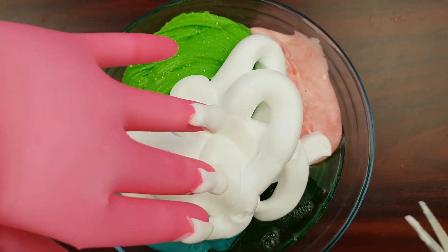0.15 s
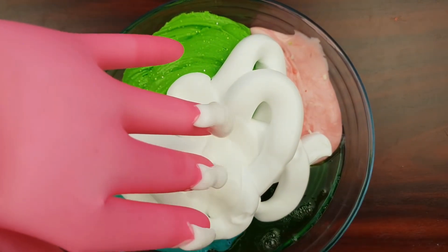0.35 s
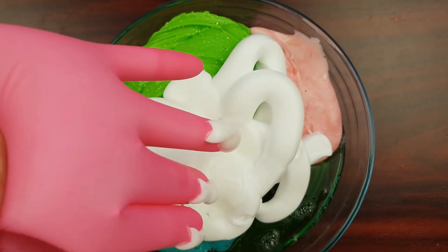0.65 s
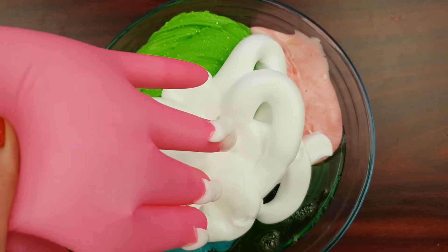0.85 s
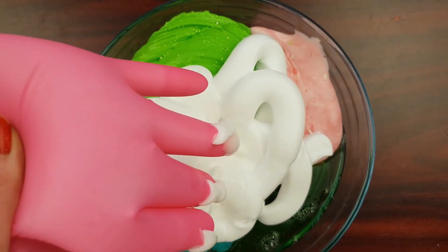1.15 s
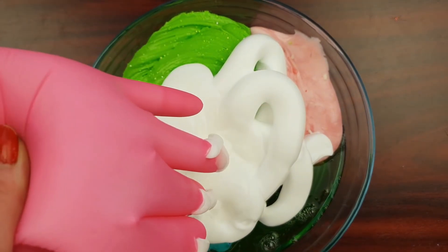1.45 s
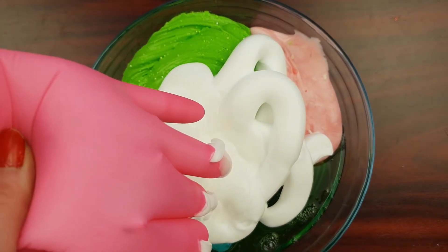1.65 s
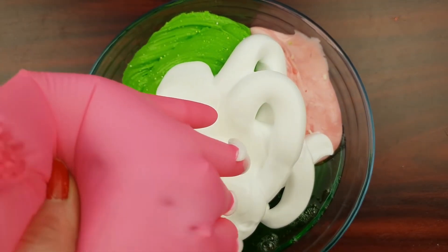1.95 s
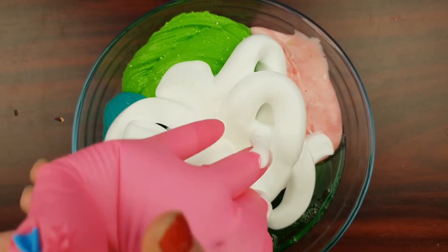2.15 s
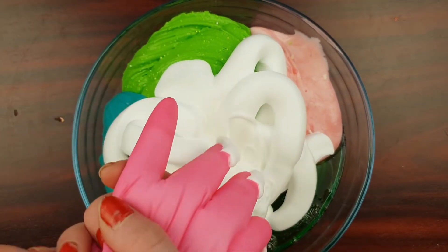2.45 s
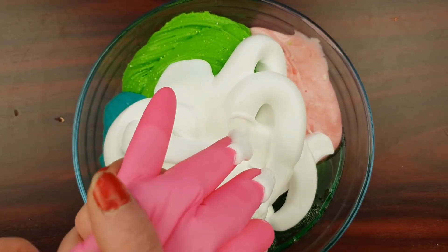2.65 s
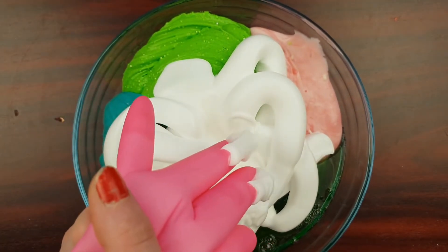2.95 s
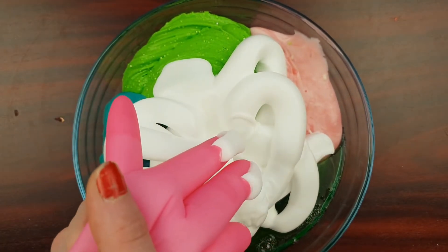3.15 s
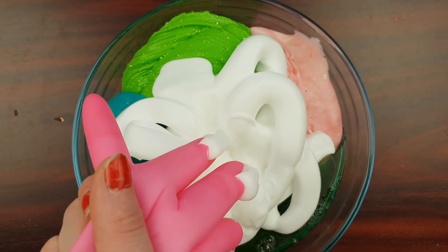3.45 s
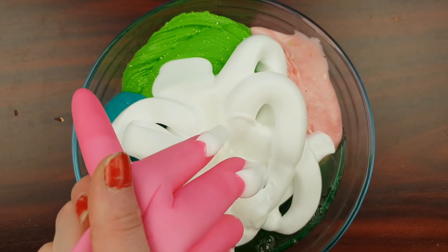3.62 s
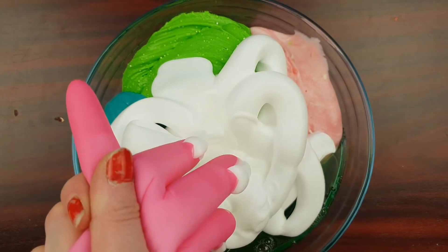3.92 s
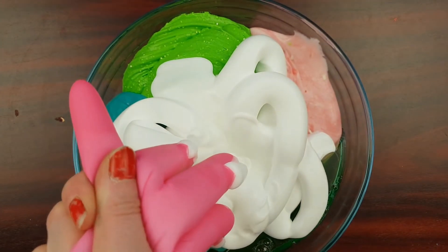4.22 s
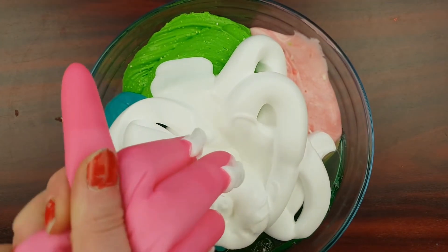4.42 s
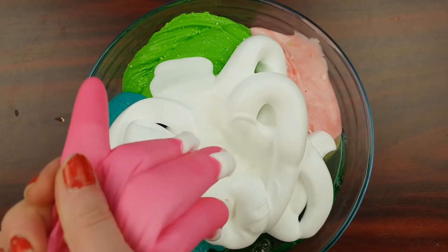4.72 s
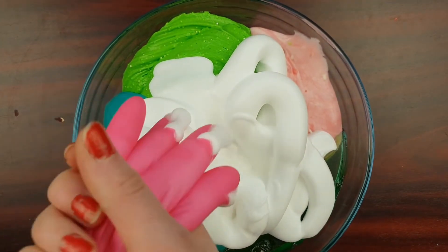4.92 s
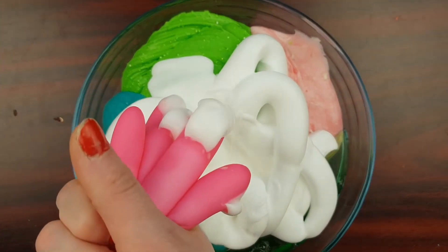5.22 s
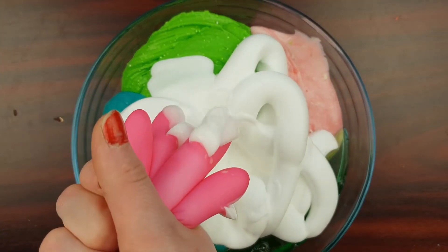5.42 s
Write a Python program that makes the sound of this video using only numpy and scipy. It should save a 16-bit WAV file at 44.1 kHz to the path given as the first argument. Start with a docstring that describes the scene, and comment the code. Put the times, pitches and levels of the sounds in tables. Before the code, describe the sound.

Close microphone, mostly left of centre, small room with low rumble. Foam sputters and fizzes from rubber fingertips, bubbles snap, and two openings gurgle upwards before breaking into puffs. Crumpled rubber rubs softly, then trapped air spits and blasts out with a hollow ring. A hissing squeal and quick squeaks follow; after quiet rubbing, bright pops and a small squelch end it.

```python
"""A rubber glove full of foam and air is squeezed over a glass bowl, close by in a small room.
Over low room rumble and a deep throb, the cut fingertips sputter with shaped noise grains and bubbles pop
as gliding sines with noise cracks. Two fingertips gurgle upwards as rough harmonics, rubber rubs as dense
grains, a wet opening spits, and trapped air bursts out as ragged noise that sets the hollow ringing.
Then openings squeal like wet reeds with hissing jets, among more rubs and pops, and one last squelch."""
import sys
import numpy as np
from scipy import signal
from scipy.fft import rfft, irfft
from scipy.io import wavfile
from scipy.ndimage import uniform_filter1d

SR = 44100
rng = np.random.default_rng(int(sys.argv[2]) if len(sys.argv) > 2 else 0)


def put_to_file(sound):
    """Save the sound as 16-bit audio at rate SR, in the file named by the first command-line argument."""
    columns = np.atleast_2d(sound).T  # one column per channel
    safe = np.clip(columns, -1, 1)
    whole_steps = np.round(safe * 32767)
    wavfile.write(sys.argv[1], SR, whole_steps.astype(np.int16))


N = 246078
T = np.arange(N) / SR  # time [s]


def undb(db):
    """Decibels to gain."""
    return 10 ** (np.asarray(db) / 20)


def unit(x):
    """Scale to rms 1."""
    return x / np.sqrt(np.mean(x ** 2) + 1e-20)


def follow(table):
    """The samples that a curve table covers, and its columns at those samples."""
    s, *columns = np.transpose(table)
    at = np.flatnonzero((T >= s.min()) & (T <= s.max()))
    return at, [np.interp(T[at], s, c) for c in columns]


def around(s, size):
    """The samples around a moment, and their times from it."""
    steps = np.arange(size) - size // 2
    return int(s * SR) + steps, steps / SR


def lay(at, x):
    """Put a short sound at its samples on a silent track."""
    return np.bincount(at, x, N)[:N]


def stroke(t, rise_s, hold_s, fall_s, sag_db_per_s=0):
    """Level in dB of one push: 0 at t = 0, sagging while held; rise and fall each span 30 dB."""
    outside = np.maximum(-t, 0) / rise_s + np.maximum(t - hold_s, 0) / fall_s
    return -30 * outside - sag_db_per_s * np.clip(t, 0, hold_s)


def ease(x, first, last):
    """Smooth step from one value to another, halfway at x = 0."""
    return first + (last - first) * (1 + np.tanh(x / 2)) / 2


def colour(x, points, size=4096):
    """Causal minimum-phase filter through (Hz, dB) points; the result has rms 1."""
    hz, db = np.transpose(points)
    f = np.log(np.maximum(np.arange(size // 2 + 1), .5) * SR / size)
    # beyond the outermost points the response falls away steeply
    outside = np.maximum(np.log(hz[0]) - f, 0) + np.maximum(f - np.log(hz[-1]), 0)
    log_gain = np.log(undb(np.interp(f, np.log(hz), db))) - 2 * outside
    # folding the cepstrum forward in time makes the filter causal
    cepstrum = irfft(log_gain)
    cepstrum[1:size // 2] *= 2
    cepstrum[size // 2 + 1:] = 0
    response = irfft(np.exp(rfft(cepstrum)))
    return unit(signal.oaconvolve(x, response)[:len(x)])


def band(x, low_hz, high_hz):
    """Band-pass: takes away the bass below and the treble above."""
    sos = signal.butter(3, [low_hz, high_hz], "band", fs=SR, output="sos")
    return signal.sosfilt(sos, x)


def wander(count, hz):
    """Smooth random motion up to a given rate, rms 1."""
    return unit(signal.sosfilt(signal.butter(2, hz, fs=SR, output="sos"), rng.standard_normal(count)))


def whistle(hz, width_hz):
    """Noise in one resonance whose centre may slide; rms 1."""
    n = len(hz)
    slow_noise = wander(n, width_hz) + 1j * wander(n, width_hz)
    carrier = np.exp(2j * np.pi * np.cumsum(hz) / SR)
    return unit((slow_noise * carrier).real)


def grains(count, rate, spread_db, hiss):
    """Tiny films tearing at random moments (rate per second), uneven in size, over a smooth rush of air."""
    clicks = (rng.random(count) < rate / SR) * rng.choice([-1, 1], count)
    sizes = undb(spread_db * np.minimum(rng.exponential(size=count), np.pi))
    return unit(unit(clicks * sizes) + hiss * rng.standard_normal(count))


def room_tone(level_db=-62, shared_db=-2, own_db=-2):
    """Low room rumble and faint hiss: filtered noise, partly shared by the two channels."""
    # spectrum: (frequency [Hz], level [dB])
    tone_colour = [(15, -39), (25, -8), (117, -7), (301, -22), (714, -29), (796, -27.5), (1230, -28.5),
                   (1840, -30.5), (16000, -34.5)]
    shared, *own = (colour(rng.standard_normal(N), tone_colour) for _ in range(3))
    return undb(level_db) * (undb(shared_db) * shared + undb(own_db) * np.array(own))


def throb(hz=36.9, level_db=-50.5, full_s=.8):
    """A deep throb while the glove is taut: one sine that swells, sags and drops away."""
    db = level_db + stroke(T - full_s, rise_s=1.24, hold_s=1.36, fall_s=.2, sag_db_per_s=6)
    return unit(np.sin(2 * np.pi * hz * T)) * undb(db)


def sputter(sag_db_per_s=17):
    """Foam breaks up at the fingertips in overlapping spurts: low crackles and a fine spray."""
    # spurts of foam: (time [s], crackle level [dB], spray level [dB], rise [s], hold [s], fall [s])
    spurts = [(0, -31, -32.5, .02, 0.047, 0.2), (0.082, -25, -31, 0.082, 0.007, 0.099),
              (0.147, -28, -32.5, 0.071, 0.016, 0.12), (0.257, -37.5, -41, 0.6, 0.38, 0.21),
              (0.33, -25.5, -33.5, .14, 0.0046, .04), (0.388, -55, -37.5, 0.014, 0.0045, 0.018),
              (0.445, -54, -34.5, 0.011, 0.0031, 0.017), (0.817, -57.5, -66.5, .1, 0.18, 0.38)]
    # spectra: (frequency [Hz], level [dB])
    crackle_colour = [(130, -22), (290, -8.5), (550, -8), (950, -2.5), (1400, -1.5), (2200, -6.5),
                      (3100, -21.5), (5000, -30)]
    spray_colour = [(2500, -8), (4300, 5.5), (6500, 6), (12000, 4), (16000, 5.5)]
    t, power = T[:2 * SR], 0
    for s, crackle_db, spray_db, *shape in spurts:
        peaks = undb([crackle_db, spray_db])
        envelope = undb(stroke(t - s, *shape, sag_db_per_s))
        power = power + np.outer(peaks, envelope) ** 2  # overlapping spurts add in power
    crackle_gain, spray_gain = np.sqrt(power)
    crackle = colour(grains(len(t), rate=900, spread_db=1.0, hiss=.35), crackle_colour)
    spray = colour(grains(len(t), rate=1600, spread_db=2.5, hiss=0.8), spray_colour)
    return lay(np.arange(len(t)), crackle * crackle_gain + spray * spray_gain)


def pops(glide_s=0.0034, skirt_db=-14):
    """A film snaps with a noise crack and the opening bubble rings, most often rising in pitch."""
    # bubbles and snaps: (time [s], ring level [dB], starting pitch [Hz], glide [octaves], ring t60 [s],
    # crack level [dB], crack centre [Hz], crack t60 [s])
    bubbles = [(.084, -24, 1560, 0.57, 0.0027, -31, 3100, 0.016),
               (0.332, -18, 1300, 0, 0.011, -37, 2980, 0.008),
               (0.338, -10, 1530, 0.5, 0.0055, -25, 3000, 0.01),
               (1.574, -57, 1050, 0, 0.033, -57, 1930, 0.11),
               (1.897, -31, 3270, 0.46, 0.0059, -41.5, 2040, 0.021),
               (2.3582, -17.5, 2916, 0.2, 0.011, -7.5, 9100, 0.0056),
               (2.429, -36, 1590, 0.012, 0.011, -47, 3500, 0.017),
               (2.465, -26.5, 936, 0, 0.017, -35.5, 1860, 0.036),
               (2.617, -11, 1555, 0.74, 0.0042, -22.5, 2970, 0.013),
               (2.646, -28, 570, 0, 0.013, -38.5, 1000, 0.055),
               (2.7262, -10.5, 790, 0.064, 0.0058, -26, 1504, 0.0091),
               (2.7622, -4.5, 940, 0.17, 0.015, -7.5, 1700, 0.0067),
               (4.752, -39.5, 1950, 0.12, 0.019, -58, 3003, .02),
               (5.119, -25, 3300, 0.24, 0.011, -27.5, 10600, 0.011),
               (5.123, -25, 3980, 0.27, 0.033, -39.5, 4360, 0.15),
               (5.201, -11.5, 2980, 0.8, 0.037, -20, 3000, 0.032),
               (5.2035, -25, 1613, 0.032, 0.054, -42, 900, 0.12),
               (5.205, -23, 8040, 0.74, 0.029, -35, 7000, 0.067),
               (5.245, -11.5, 2650, 0.1, 0.027, -42, 1480, 0.016),
               (5.2468, -32, 854, 0.092, 0.034, -44, 1597, 0.018),
               (5.25, -18, 3480, 0.21, 0.028, -43, 4000, .02),
               (5.3217, -18.5, 975, 0.41, 0.019, -21, 2520, 0.079),
               (5.442, -45, 4030, .1, .008, -40.5, 7930, 0.016)]
    t, out = T[:SR // 8], 0
    fall_db = -60 * t
    for s, db, hz, glide, t60, crack_db, crack_hz, crack_t60 in bubbles:
        pitch = hz * 2 ** (glide * (1 - np.exp(-t / glide_s)))
        ring = np.sin(2 * np.pi * np.cumsum(pitch) / SR) * undb(db + fall_db / t60)
        crack_colour = [(crack_hz / 4, skirt_db), (crack_hz, 0), (crack_hz * 4, skirt_db)]
        crack = colour(rng.standard_normal(len(t)), crack_colour)
        crack = crack * undb(crack_db + fall_db / crack_t60)
        out = out + lay(int(s * SR) + np.arange(len(t)), ring + crack)
    return out


def reed(note, below_db, above_db, floor_db, jitter, shake_hz, shimmer_db, air_db, rush_db,
         rush_width_hz=220, count=6):
    """A wet opening flaps unevenly; its cavity lifts near harmonics and rushes; air leaks once a cycle."""
    at, (hz, db, cavity_hz, rough) = note
    n = len(at)
    shaken_hz = hz * (1 + jitter * rough * wander(n, shake_hz))
    phase = 2 * np.pi * np.cumsum(shaken_hz) / SR
    tone = 0
    for k in range(1, count + 1):
        octaves = np.log2(k * hz / cavity_hz)
        # straight slope in octaves below the resonance, a curve in octaves squared above it
        slope_db = np.where(octaves < 0, -octaves * below_db, octaves ** 2 * above_db)
        cavity_db = np.maximum(slope_db, floor_db)
        shimmer = shimmer_db * rough * wander(n, shake_hz)
        tone = tone + undb(cavity_db + shimmer) * np.sin(k * phase + k * k)
    tone = tone / np.sqrt(uniform_filter1d(tone ** 2, size=500) + 1e-12)  # even out the running level
    air_colour = [(300, -23.5), (900, 9.5), (2700, -6.5), (6000, -10.0), (15000, -7)]  # (Hz, dB)
    air = colour(rng.standard_normal(n) * (1 + np.cos(phase)), air_colour)
    rush = whistle(cavity_hz, rush_width_hz)
    breath = undb(air_db) * air + undb(rush_db) * rush
    return lay(at, (tone + rough * breath) * undb(db))


def slacken(table):
    """A gurgling note: its cavity sinks and its flapping evens out as the pressure runs out."""
    at, (hz, db) = follow(table)
    cavity_hz = ease((T[at] - 1.005) / .055, 995, 740)
    rough = ease((T[at] - .79) / .11, 0.688, 0.3)
    return at, (hz, db, cavity_hz, rough)


def gurgle(start_s=1.06, full_s=1.17, gap_s=1.3, pulse_hz=22.3):
    """Two fingertips gurgle upwards in pitch; as the pressure runs out the first breaks into puffs."""
    # the two fingertips: (time [s], pitch [Hz], level [dB])
    first_notes = [(.33, 300, -46), (.44, 317.8, -34), (.58, 337, -35), (.66, 376.4, -39.5),
                   (.975, 411, -41), (1.02, 385.7, -42), (1.23, 390.3, -46), (1.33, 399.4, -60),
                   (1.37, 395, -81)]
    second_notes = [(.38, 220, -57), (.5, 241.5, -51), (.72, 279.8, -42.5), (.87, 313.2, -38),
                    (.94, 396, -38), (1.02, 444, -47), (1.18, 505, -59.5)]
    first, second = (
        reed(slacken(notes), below_db=-9, above_db=-20, floor_db=-21, jitter=.08, shake_hz=75,
             shimmer_db=9, air_db=-28, rush_db=-25, count=5)
        for notes in (first_notes, second_notes))
    pulses = np.cos(np.pi * pulse_hz * (T - gap_s)) ** 2
    closing = np.interp(T, [start_s, full_s], [0, 1]) * pulses
    return first * (1 - closing) + second


def rub(s, db, rise_s, hold_s, fall_s, tilt_db, pocket_hz, pocket_db, pivot_hz=2500, pocket_width_hz=260):
    """Soft dense friction of the crumpled rubber; the air pocket under it rings along."""
    # spectrum before the tilt: (frequency [Hz], level [dB])
    rub_colour = [(200, -25.5), (700, -12.5), (1100, -11.5), (1550, -3), (2200, -7), (3200, -0.5),
                  (6000, -7), (11000, -10), (16000, -13)]
    at, t = around(s, size=36000)
    tilted = [(hz, level + tilt_db * np.log2(hz / pivot_hz)) for hz, level in rub_colour]
    friction = colour(grains(len(at), rate=1500, spread_db=5.5, hiss=1.0), tilted)
    pocket = whistle(np.full(len(at), pocket_hz), pocket_width_hz)
    envelope = undb(stroke(t, rise_s, hold_s, fall_s, sag_db_per_s=13))
    return lay(at, (undb(db) * friction + undb(pocket_db) * pocket) * envelope)


def tighten(row, surge_share=0.35, tighten_share=.09):
    """A squealing note: air surges, then the opening tightens, moving pitch, cavity and roughness together."""
    start, length, attack, release, db, surge_db, tight_share, *open_and_tight = row
    hz, tight_hz, cavity_hz, tight_cavity_hz, rough, tight_rough = open_and_tight
    at, t = around(start, size=22000)
    share = t / length  # position within the squeal
    tight = (share - tight_share) / tighten_share
    opening_db = 20 * np.log10(1 - np.exp(-np.maximum(t, 1e-9) / attack))
    surge = surge_db * np.exp(-(share / surge_share) ** 2)
    db = db + opening_db + stroke(t, attack, length, release) + surge
    cavity = 2 ** ease(tight, np.log2(cavity_hz), np.log2(tight_cavity_hz))
    return at, (ease(tight, hz, tight_hz), db, cavity, ease(tight, rough, tight_rough))


def jet(s, db, rise_s, hold_s, fall_s, first_hz, last_hz, width_hz, skirt_db, glide_s=0.007):
    """Rushing air rings a small cavity whose resonance slides as it changes shape."""
    at, t = around(s, size=14000)
    hz = last_hz + (first_hz - last_hz) * np.exp(-np.maximum(t, 0) / glide_s)
    skirt = colour(rng.standard_normal(len(t)), [(2500, 4), (4500, 3), (15000, -2.5)])
    envelope = undb(db + stroke(t, rise_s, hold_s, fall_s, sag_db_per_s=95))
    return lay(at, (whistle(hz, width_hz) + undb(skirt_db) * skirt) * envelope)


def squeals():
    """Air forced through single fingertips: a spit, a long squeal, a short one, a clean squeak, a squelch."""
    # squealing openings: (start [s], length [s], attack [s], release [s], level [dB], opening surge [dB],
    # tightening point [share of length], open pitch [Hz], tight pitch [Hz], open cavity [Hz],
    # tight cavity [Hz], open roughness [0-1], tight roughness [0-1])
    openings = [(2.718, .032, 0.0067, 0.011, -24, -0.5, 0.61, 769.5, 1195, 894, 4770, 0.91, 0.95),
                (3.235, .176, 0.0082, 0.015, -29, 13.5, .71, 826.2, 1008, 851, 2900, .6, .25),
                (3.563, 0.07, 0.0095, 0.015, -30, 4.5, .3, 1271, 1483, 1310, 1630, 0.542, 0.53),
                (3.639, 0.019, 0.0087, 0.017, -25.5, -1, 0.37, 1344, 1398, 1600, 1920, .45, 0.17),
                (5.3203, 0.036, .001, 0.082, -35, 16.5, .5, 852.6, 1240, 1300, 2333, 0.58, 0.93)]
    # thin jets of hissing air: (time [s], level [dB], rise [s], hold [s], fall [s], first centre [Hz],
    # last centre [Hz], width [Hz], broad hiss relative to the whistle [dB])
    hisses = [(3.235, -20.5, 0.0021, .001, 0.019, 10740, 10050, 1100, -16.5),
              (3.396, -48, .12, 0.0044, 0.058, 9540, 10600, 1130, 9.5),
              (3.589, -30, 0.026, 0.073, 0.017, 13900, 7260, 760, 0.5),
              (5.326, -29.5, .005, 0.0079, 0.015, 7700, 7950, 424, -20)]
    spit, long, short, squeak, squelch = map(tighten, openings)
    out = reed(spit, below_db=-13, above_db=-18, floor_db=-13, jitter=0.18, shake_hz=340,
               shimmer_db=5, air_db=0.0, rush_db=-9.5)
    out += reed(long, below_db=-7, above_db=-60, floor_db=-28, jitter=.19, shake_hz=290,
                shimmer_db=4.5, air_db=-11, rush_db=-2.5)
    for note in (short, squeak):
        out += reed(note, below_db=-3, above_db=-19, floor_db=-19, jitter=.26, shake_hz=300,
                    shimmer_db=5, air_db=-10, rush_db=-5)
    out += reed(squelch, below_db=-13.0, above_db=-30, floor_db=-13.5, jitter=0.19, shake_hz=277,
                shimmer_db=0.5, air_db=-8, rush_db=-2)
    out += sum(jet(*row) for row in hisses)
    return band(out, low_hz=660, high_hz=15000)


BURST_S = 2.763  # the trapped air bursts out


def burst(level_db=-13):
    """A pocket of air blows the foam out in a ragged blast."""
    # spectrum: (frequency [Hz], level [dB])
    burst_colour = [(59, -41.5), (100, -32), (174, -23.5), (277, -2), (535, -17.5), (891, -1.5),
                    (1200, -12.5), (1360, -10), (1800, -11), (2040, -6.5), (2320, -16.5), (2690, -7.5),
                    (3320, -13), (8280, -24), (16000, -21.5)]
    at, t = around(BURST_S, size=24000)
    tearing = grains(len(at), rate=800, spread_db=2.5, hiss=.45)
    envelope = undb(level_db + stroke(t, rise_s=.0015, hold_s=0.052, fall_s=0.097))
    return lay(at, colour(tearing, burst_colour) * envelope)


def hollow(ring_db=-21, build_s=.006):
    """The blast sets the bowl and the hollow of the glove ringing as decaying sines."""
    # resonances: (frequency [Hz], level relative to ring_db [dB], t60 [s])
    modes = [(280, 1, .27), (344, -5, .3), (394, -3, .32), (714, -5, .27), (865, -6, .27)]
    t = T[:SR // 2]
    ring = 0
    for hz, db, t60 in modes:
        ring = ring + undb(db - 60 * t / t60) * np.sin(2 * np.pi * (hz * t + rng.random()))
    return lay(int(BURST_S * SR) + np.arange(len(t)), undb(ring_db) * (1 - np.exp(-t / build_s)) * ring)


def place(x, lag_ms, left_db, scatter_db, scatter_t60=0.039, scatter_hz=900, size=2048):
    """The right channel lags by lag_ms; bowl, hand and table scatter the treble differently to each side."""
    t = T[:size]
    scatter = rng.standard_normal((2, size)) * undb(-60 * t / scatter_t60)
    scatter = signal.sosfilt(signal.butter(1, scatter_hz, "high", fs=SR, output="sos"), scatter)
    response = undb(scatter_db) * unit(scatter) / np.sqrt(size)
    # direct sound
    response[0, 0] += 1
    response[1, int(lag_ms * SR / 1000)] += 1
    # left_db is left minus right; the last factor keeps the total power
    response *= undb(np.array([[left_db], [-left_db]]) / 2) / np.sqrt(1 + undb(2 * scatter_db))
    return signal.oaconvolve(x[None], response, axes=1)[:, :N]


def spread(source, lag_ms, left_db, own_db):
    """A wide, grainy source: both sides share some grains, the left first, and each has others to itself."""
    shared, *own = (source() for _ in range(3))
    both = np.array([shared, np.roll(shared, int(lag_ms * SR / 1000))])
    balance = undb(np.array([[left_db], [-left_db]]) / 2)
    return (both + undb(own_db) * np.array(own)) * balance / np.sqrt(1 + undb(2 * own_db))


def room(x, wet_db=-15, t60=0.3, build_s=0.0035):
    """The small room answers with a short diffuse tail of decaying noise."""
    # spectrum of the tail: (frequency [Hz], level [dB])
    room_colour = [(80, -5), (300, 2.5), (1000, -3.5), (3000, -3.5), (8000, -4), (16000, -8)]
    t = T[:SR * 3 // 4]
    envelope = np.exp(-np.log(1000) * t / t60) * (1 - np.exp(-t / build_s))
    tails = np.array([colour(rng.standard_normal(len(t)) * envelope, room_colour) for _ in x])
    return undb(wet_db) * signal.fftconvolve(x, tails / np.sqrt(len(t)), axes=1)[:, :N]


def scene():
    """The glove leans to the left by varying amounts; the thump and ringing of the blast lean right."""
    # rubber on rubber and skin: (time [s], level [dB], rise [s], hold [s], fall [s], tilt [dB per octave],
    # air pocket [Hz], pocket level [dB], left minus right [dB])
    rubs = [(2.122, -44, 0.018, 0.093, 0.08, 1.6, 1526, -47, 5.5),
            (2.2, -39.5, 0.14, .14, 0.24, 1, 1507, -48, 4.5),
            (2.555, -50.5, 0.044, 0.043, 0.46, 1, 1553, -49.5, 8.5),
            (4.425, -49, 0.3, 0.0086, 0.086, 1, 1660, -56.5, 8.5),
            (4.559, -55, 0.12, 0.25, 0.22, 0.5, 3050, -60, 10),
            (4.58, -36.5, 0.032, 0.0025, 0.031, -4, 1690, -40.5, 7.5),
            (4.923, -40.5, 0.18, 0.009, 0.087, 0, 2785, -47.5, 7)]
    near = spread(sputter, lag_ms=0.39, left_db=5.0, own_db=0)
    near += place(band(pops(), low_hz=640, high_hz=14000), lag_ms=.15, left_db=4.5, scatter_db=-6)
    near += place(gurgle(), lag_ms=.32, left_db=6.3, scatter_db=-12)
    for *push, left_db in rubs:
        near += spread(lambda: rub(*push), lag_ms=.22, left_db=left_db, own_db=4.6)
    near += place(squeals(), lag_ms=.07, left_db=3, scatter_db=-7)
    near += spread(lambda: band(burst(), low_hz=360, high_hz=15000), lag_ms=.14, left_db=2.5, own_db=1.5)
    thump = undb(-5) * band(burst(), low_hz=40, high_hz=420)
    near += place(hollow() + thump, lag_ms=0, left_db=-4.5, scatter_db=-12)
    near = band(near, low_hz=55, high_hz=15200)
    return near + room(near) + throb() + room_tone()


def record(dry, top_hz=15900):
    """Peaks clip at full scale, then a steep low-pass cuts the extreme treble."""
    clipped = np.clip(dry, -1, 1)
    return signal.sosfilt(signal.ellip(10, .2, 70, top_hz, fs=SR, output="sos"), clipped)


dry = scene()
out = record(dry)
put_to_file(out)
```